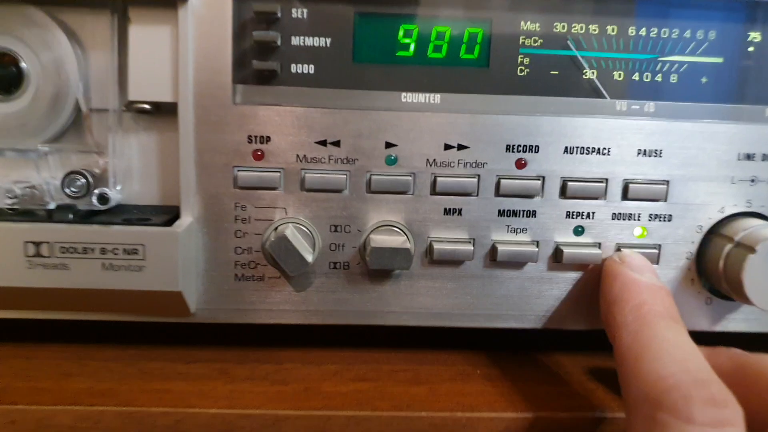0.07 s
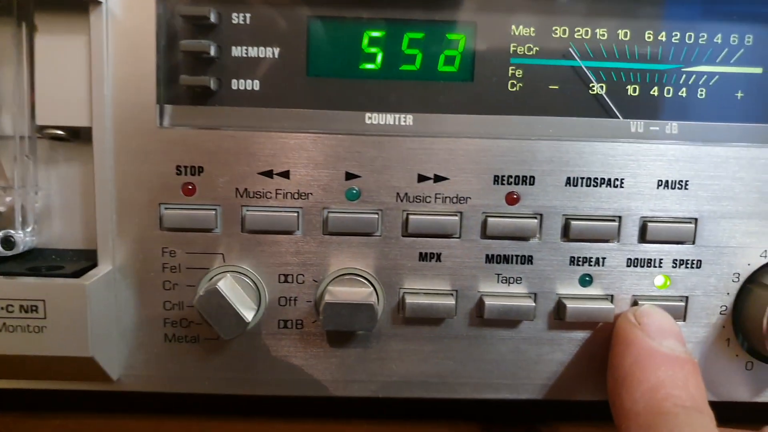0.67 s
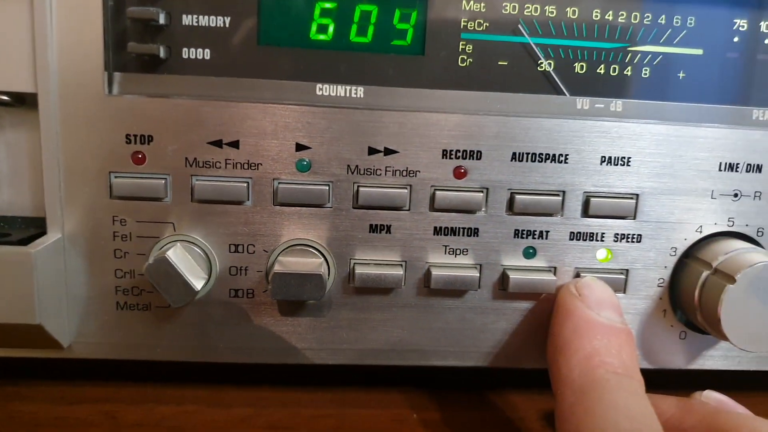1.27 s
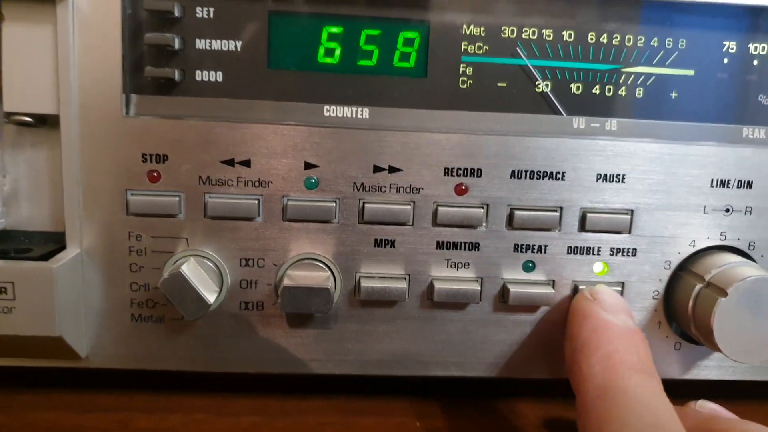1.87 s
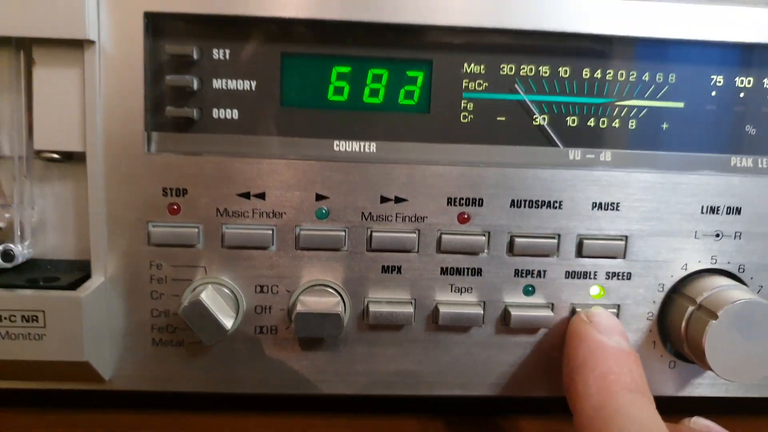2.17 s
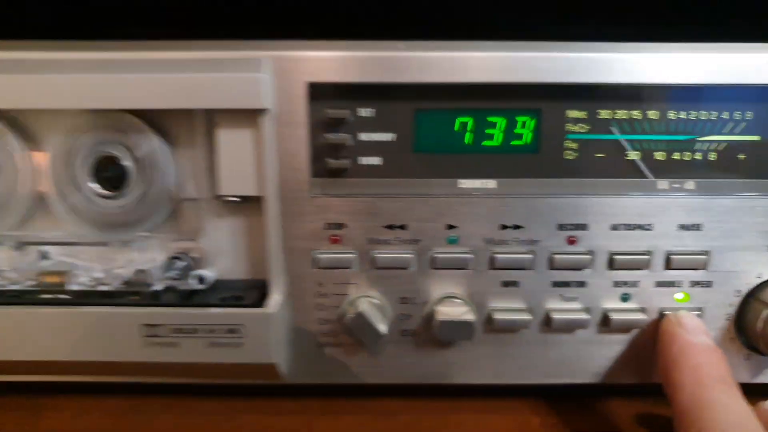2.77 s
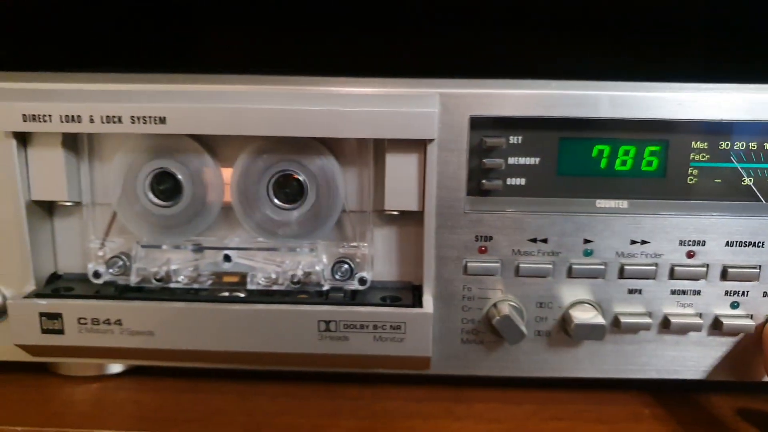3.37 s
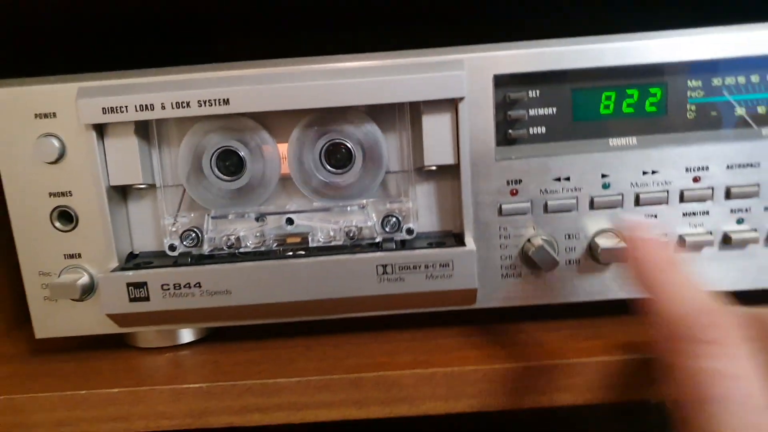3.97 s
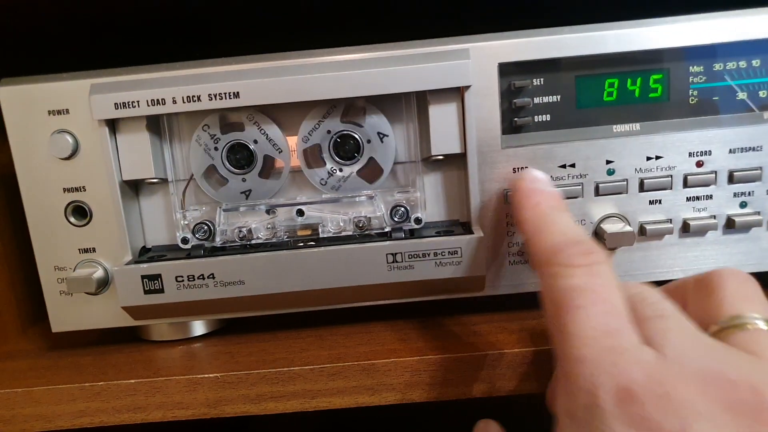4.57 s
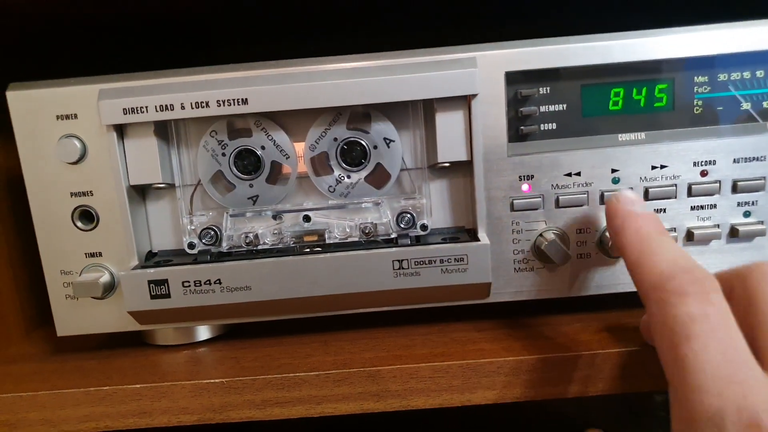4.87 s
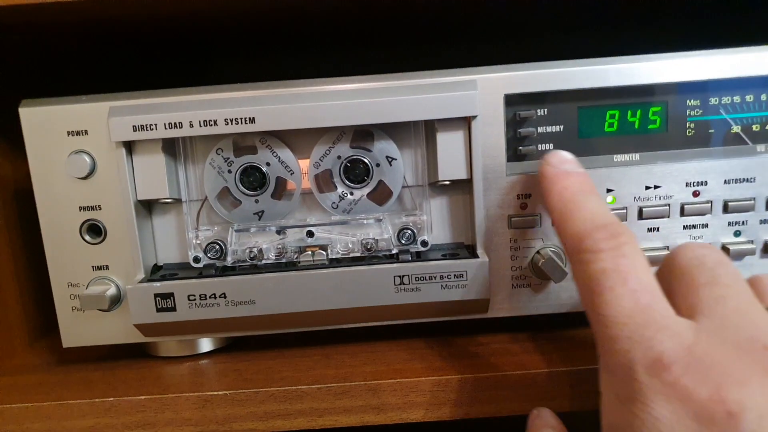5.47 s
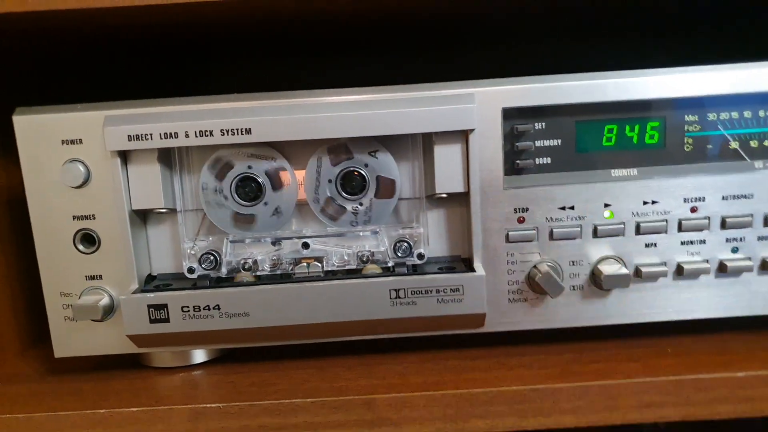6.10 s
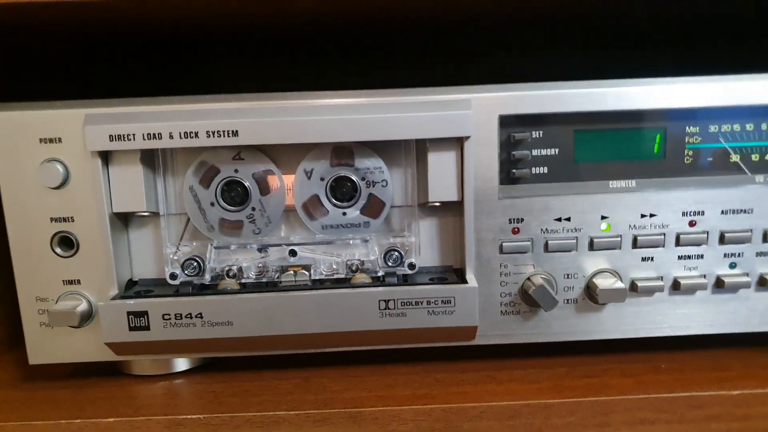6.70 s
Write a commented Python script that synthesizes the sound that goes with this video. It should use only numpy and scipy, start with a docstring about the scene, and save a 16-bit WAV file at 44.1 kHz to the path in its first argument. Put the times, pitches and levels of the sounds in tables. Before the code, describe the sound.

Close up in a small room, tape reels spin fast in a cassette deck, whirring and rasping over a motor hum, ticking now and then as the tape snags. Past halfway the whirr slows and softens, then ends in a clunk. Light button clicks alternate with three heavier clacks of the mechanism, leaving only a faint whisper of moving tape.

```python
"""Cassette deck winding, then playing

Close up, a deck fast-winds: the motor hums, the reel hubs rasp and rattle once a turn, the tape snags.
The winding drops to about half speed and stops with a clunk. Keys click, the mechanism slams into the
chassis three more times, and the tape runs on quietly at playing speed in a small room.
The listening point swings from beside the keys to the front of the cassette."""
import sys
import numpy as np
from scipy import signal
from scipy.fft import rfft, irfft, next_fast_len
from scipy.io import wavfile
from scipy.ndimage import map_coordinates

SR = 44100
rng = np.random.default_rng(int(sys.argv[2]) if len(sys.argv) > 2 else 0)


def file_out(sig):
    """Save sig as 16-bit WAV at sys.argv[1]."""
    # one column per channel
    cols = np.atleast_2d(sig).T
    # limit, then scale
    lim = np.clip(cols, -1, 1)
    pcm = np.round(lim * 32767).astype(np.int16)
    wavfile.write(sys.argv[1], SR, pcm)


N = 297234
TIME = np.arange(N) / SR
STOP_S = 4.52  # the brakes bite

# How hard the tape drags on hubs and guides: time_s, level_db
TAPE_DRAG = [(0, -0.8), (0.5, 0.5), (0.85, -1.5), (1.55, -0.8), (2.4, 0.5), (2.7, -0.4), (3.25, 0.5),
             (3.58, 0), (3.8, 1.5), (4.45, -3)]
# Hollow ring of the cassette shell: pitch_hz, width_hz, side_db, front_db
SHELL_MODES = [(1494, 260, -4, 2.5), (1677, 80, 2, -22), (1799, 40, 4, 9.5), (2250, 120, -5.5, -32)]
# Brighter ring of the hubs: pitch_hz, width_hz, side_db, front_db
HUB_MODES = [(2627, 55, 2, -5), (2853, 63, -10, 7), (3493, 64, -1.5, -3), (3830, 114, -2.5, -9),
             (4150, 200, -14.5, 3.5), (4256, 78, -1.5, -22.5), (4620, 245, -3.5, -1),
             (5460, 170, -11.5, -17.5)]
# Coarse body of the friction: freq_hz, level_db
RASP_SPECTRUM = [(1120, -18.5), (1900, -5), (1990, -11), (2190, -2), (2400, -5.5), (2550, -3), (2700, 0.5),
                 (3200, -7.5), (3560, -0.5), (4130, -5), (4700, -5), (5160, -24), (6500, -21.5),
                 (8450, -56.5), (14300, -120)]
# Its bright hiss: freq_hz, level_db
HISS_SPECTRUM = [(3240, -26.5), (5500, -1.5), (5920, -3.5), (6830, -7.5), (7390, -9.5), (9300, -3.5),
                 (10500, -17), (13600, -35), (22000, -120)]
# Its fizzy top: freq_hz, level_db
SIZZLE_SPECTRUM = [(6180, -36), (10500, -4.5), (11100, -1.5), (12100, 2), (15100, -10), (15800, -6.5)]
REEL_TURNS_PER_S = 66.5  # the emptying reel at double speed


def reels():
    """Gritty friction rings the hubs and the shell; slow reels chatter in separate beats."""
    turns = np.cumsum(REEL_TURNS_PER_S * drive() * (1 + 0.008 * wobble(8))) / SR
    slow = 1 - drive()
    grit = unit(amp(2 * wobble(900) + 0.47 * wobble(60)))
    friction = grit * rub(turns, sharp=0.28 + 0.08 * slow, scatter_db=1.56)
    beats = rub(turns, sharp=0.15 + 1.9 * slow + 0.6 * shudder(), scatter_db=1)
    shell = rattling(noise(apart=0.99) * beats, SHELL_MODES)
    chatter = coloured(shell, [(900, -19), (1300, -12.5), (1450, 4), (2300, -2.5), (3200, -8.5)])
    hubs = rattling(noise(apart=1) * friction, HUB_MODES)
    rasp = amp(-5.5) * coloured(noise(apart=0.99) * friction, RASP_SPECTRUM) + amp(-3) * hubs
    hiss = coloured(noise(apart=1) * friction * amp(2.1 * wobble(120)), HISS_SPECTRUM)
    sizzle = coloured(noise(apart=0.86) * friction * amp(2.9 * wobble(120)), SIZZLE_SPECTRUM)
    chatter *= winding_gain(-47.5, doubling_db=4, front_db=0, shudder_db=3.5)
    rasp *= winding_gain(-40, doubling_db=9.5, front_db=-0.5, shudder_db=4)
    hiss *= winding_gain(-56.5, doubling_db=12.5, front_db=4, shudder_db=1.5)
    sizzle *= winding_gain(-52, doubling_db=7.5, front_db=-2, shudder_db=1.2)
    return amp(curves(TAPE_DRAG)[0]) * (chatter + rasp + hiss + sizzle)


def rub(turns, sharp, scatter_db):
    """A hub catches once a turn, each time with a new strength."""
    strength = amp(scatter_db * rng.standard_normal(int(turns[-1]) + 2))
    return unit(np.exp(-sharp * np.cos(2 * np.pi * turns)) * strength[turns.astype(int)])


def rattling(x, modes):
    """A part's resonances, whose strengths depend on where the listener is."""
    facing = curves(LISTENER_PATH)[0]
    side = resonate(x, [(hz, width, db) for hz, width, db, _ in modes])
    front = resonate(x, [(hz, width, db) for hz, width, _, db in modes])
    return (1 - facing) * side + facing * front


def drive():
    """Share of double speed: it drops when the double-speed key is let go, then creeps up."""
    release_s, slowed_s = 3.46, 3.72
    return np.interp(TIME, [release_s, slowed_s], [1, 0.56]) + 0.06 * since(slowed_s)


def running():
    """1 while the deck winds, falling fast when the brakes bite."""
    return amp(-400 * since(STOP_S))


def shudder():
    """0-1: a snag leaves the reel shaking loosely on its hub."""
    return held(0.864, attack=0.031, hold=0.18, release=0.38)


def winding_gain(db, doubling_db, front_db, shudder_db):
    """db at double speed, shifted per doubling of speed, in front of the cassette and in the shudder."""
    facing = curves(LISTENER_PATH)[0]
    return amp(db + doubling_db * np.log2(drive()) + front_db * facing + shudder_db * shudder())


# The motor's pace at double speed: time_s, turns_per_s
MOTOR_SPEED = [(0, 24.5), (0.9, 24.5), (1.7, 24.7), (2.3, 24.68), (3.4, 25.1)]
# Tones of the turning shaft: harmonic_number, level_db
SHAFT_HARMONICS = [(4, -8.5), (5, -10.5), (6, -9), (7, 1.5), (8, -6), (9, -10), (10, -8.5), (11, -3.5),
                   (14, -10), (16, -13), (17, -11), (18, -8.5), (20, -12), (21, -11.5), (22, -2),
                   (23, -7.5), (24, -8.5), (25, -14), (29, -9.5), (32, -8), (33, -17.5), (35, -16),
                   (36, -40.5), (37, -24), (38, -7.5), (39, -1), (41, -8), (43, -23.5), (45, -6.5),
                   (48, -29)]
# Motor rumble in the frame: freq_hz, level_db
FRAME_SPECTRUM = [(40, -27.5), (70, -1), (110, -2.5), (260, 1.5), (320, -13.5), (400, -4.5), (600, 2.5),
                  (680, -2.5), (790, -0.5), (1000, 0), (1200, -3), (1500, -2.5), (2200, -42)]


def motor():
    """The shaft hums and the frame rumbles; the hum sinks into the rumble as the speed drops."""
    speed = curves(MOTOR_SPEED)[0] * drive()
    turns = np.cumsum(speed * (1 + 0.001 * wobble(5.66))) / SR
    hum = sum(amp(db + 0.2 * wobble(5.1)) * np.sin(2 * np.pi * (harmonic * turns + rng.random()))
              for harmonic, db in SHAFT_HARMONICS)
    rumble = coloured(noise(apart=0.6), FRAME_SPECTRUM)
    return (unit(hum) * winding_gain(-50, doubling_db=22.5, front_db=-5.5, shudder_db=1)
            + rumble * winding_gain(-54.5, doubling_db=0.5, front_db=-2.5, shudder_db=1.5))


def hub_whine():
    """A thin, unsteady tone whines from a hub."""
    tone = noise_band(pitch_hz=3500, width_hz=22, apart=0.5)
    return tone * winding_gain(-56.5, doubling_db=13.5, front_db=1.5, shudder_db=2.5)


# Sharp ticks as the tape snags: start_s, level_db
SNAGS = [(0.3215, -24.5), (0.5107, -24.5), (0.604, -23), (0.7557, -21), (0.8785, -17.5), (2.4453, -25),
         (3.1637, -23), (3.1948, -20.5), (3.2794, -17.5), (3.4693, -22.5), (3.5425, -23)]
# The ping of a knocked hub: pitch_hz, width_hz, level_db
HUB_PING = [(2864, 70, 0), (3505, 32, 2), (4670, 140, -3)]


def snags():
    """Short scrapes of a hub against its shell, each leaving the hub ringing."""
    out, t = np.zeros((2, N)), np.arange(SR // 20) / SR
    scrape = burst(t, rise_s=0.0016, t60_s=0.03)
    for start_s, db in SNAGS:
        rasp, hiss, sizzle = (coloured(noise(apart=0.99, size=len(t)), band)
                              for band in (RASP_SPECTRUM, HISS_SPECTRUM, SIZZLE_SPECTRUM))
        tick = scrape * (amp(-7) * rasp + amp(-13.5) * (hiss + sizzle))
        ping = resonate(scrape * noise(apart=0.7, size=len(t)), HUB_PING)
        add(out, start_s, amp(db) * (tick + amp(-23.5) * ping))
    return out


# A pawl slips just ahead of a slam: start_s, level_db
PAWL_SLIPS = [(5.309, -47.5), (5.933, -35.5)]
# Scrape of the sliding arm: freq_hz, level_db
ARM_SPECTRUM = [(300, -3), (900, 10), (2300, 1.5), (4000, -5), (7000, -21), (15000, -27)]
# The mechanism slams home, its six bands relative to the level:
# start_s, level_db, boom_db, thump_db, knock_db, clank_db, crack_db, sheen_db, run_up_s
SLAMS = [(4.51, -16, -19, -17, -21, -21.5, -16, -16.5, 0.002),
         (5.336, -9, -19, -17, -23, -20.5, -16, -19.5, 0.0086),
         (5.959, -8, -23, -20, -18.5, -17.5, -15, -14, 0.0087),
         (6.166, -6.5, -21, -13.5, -19.5, -24, -15.5, -14.5, 0.013)]


def clunks():
    """Pawls slip; the head carriage scrapes up, slams into the chassis, and the heavy parts rock back."""
    out, t = np.zeros((2, N)), np.arange(SR // 20) / SR
    for start_s, db in PAWL_SLIPS:
        slip = coloured(noise(apart=0.36, size=len(t)), ARM_SPECTRUM)
        add(out, start_s, amp(db) * burst(t, rise_s=0.0023, t60_s=0.13) * slip)
    for start_s, db, *colour, run_up_s in SLAMS:
        bands_db = db + np.array(colour)
        slide = coloured(noise(apart=0.93, size=len(t)),
                         [(300, -8.5), (2000, 8), (6000, 1), (15000, -12.5)])
        add(out, start_s - run_up_s, amp(db - 12) * burst(t, rise_s=0.0039, t60_s=0.047) * slide)
        add(out, start_s, blow(bands_db, rise_s=0.0025, ring_db=4, clatter_db=5.5))
        rock_back_db = bands_db + [-10, -5.5, -6, -23.5, -35, -35]
        add(out, start_s + 0.047, blow(rock_back_db, rise_s=0.0064, ring_db=-0.5, clatter_db=2))
    return out


# Borders of boom, thump, knock, clank, crack and sheen: edge_hz
BAND_EDGES = np.array([80, 160, 300, 800, 2000, 6000, 15500])
# Ring of the struck chassis: pitch_hz, level_db, t60_s
CHASSIS_MODES = [(96, -10.5, 0.41), (130.2, 2, 0.21), (175, -5.5, 0.28), (209.3, 2, 0.17), (350, -16, 0.15),
                 (384.6, -11, .23), (407, -11, 0.18), (428, -2, 0.21), (538, -1.5, .16),
                 (553.7, -12.5, 0.24), (620, -11.5, 0.2), (693, -11.5, 0.14), (812, -11.5, 0.23),
                 (955, -10.5, 0.18), (1042, -7, 0.22), (1087, -12, 0.18), (1190, -22, .15),
                 (1480, -5, 0.089), (1530, 2, 0.088), (1700, -8.5, 0.094), (1857, -5.5, 0.078),
                 (2210, -6, 0.052), (2447, -10, 0.11), (3050, -19, 0.073), (8400, -15.5, 0.062)]
# How long the clatter hangs on: freq_hz, t60_s
CLATTER_DECAY = [(100, 0.21), (400, 0.19), (1000, 0.14), (2500, 0.062), (6000, 0.039), (15000, 0.043)]


def blow(bands_db, rise_s, ring_db, clatter_db):
    """One contact: dense clatter and the chassis modes, coloured by where and how hard it lands."""
    t = np.arange(SR // 2) / SR
    centres_hz = np.sqrt(BAND_EDGES[1:] * BAND_EDGES[:-1])
    colour = list(zip(centres_hz, bands_db))
    density_db = bands_db - 10 * np.log10(np.diff(BAND_EDGES) / (SR / 2))
    density = [(30, -59.5), *zip(centres_hz, density_db)]
    presence = [(200, -10), (1000, -1), (4000, 5.5), (7000, 0.5), (12000, 1)]
    clatter = filtered(noise(apart=1, size=len(t)),
                       lambda hz: amp(along(density, hz) + along(presence, hz)))
    clatter = fading(clatter, CLATTER_DECAY) * (1 - np.exp(-t / rise_s))
    ring = np.zeros(len(t))
    for k, (hz, db, t60_s) in enumerate(CHASSIS_MODES):
        strength = (-1) ** k * amp(db + along(colour, hz) + rng.normal(0, 1))
        swing = burst(t, rise_s=2.8 / hz, t60_s=t60_s)  # heavy low modes swing up slowly
        ring += strength * swing * np.sin(2 * np.pi * hz * t)
    return amp(clatter_db) * clatter + amp(ring_db) * ring


# Clicks of keys and catches, and at 4.559 s the first slam's heavy parts rocking back; their six bands relative
# to the level: # start_s, level_db, boom_db, thump_db, knock_db, clank_db, crack_db, sheen_db
KEY_CLICKS = [(4.46, -27.5, -31, -30, -32.5, -22, -8, -21), (4.559, -30, -10, -0.5, -10, -20.5, -10, -17),
              (5.103, -33.5, -32, -30, -30, -24, -3, -14),
              (5.255, -49.5, -15.5, -18.5, -5.5, -9, -23.5, -32.5),
              (5.776, -34, -25.5, -26, -13, -8.5, -17, -33)]
# A finger pushes a key in or lets it go: start_s, level_db
KEY_PRESSES = [(5.064, -61), (5.103, -47.5), (5.253, -55.5), (5.775, -41.5)]
# Ring of a plastic key on its stem: pitch_hz, width_hz, level_db
KEY_MODES = [(584, 57, -3.5), (1030, 150, 3), (2170, 160, -3), (3600, 320, -17.5)]


def keys():
    """Light contacts of keys and catches, and the low rock-back after the first slam; a pushed key also rings
    briefly itself."""
    out, t = np.zeros((2, N)), np.arange(SR // 5) / SR
    for start_s, db, *colour in KEY_CLICKS:
        add(out, start_s, blow(db + np.array(colour), rise_s=0.0038, ring_db=-1.5, clatter_db=3))
    for start_s, db in KEY_PRESSES:
        ring = resonate(noise(apart=0.58, size=len(t)), KEY_MODES)
        add(out, start_s, amp(db) * burst(t, rise_s=0.003, t60_s=0.17) * ring)
    return out


# Soft knocks on the case: start_s, level_db
CASE_BUMPS = [(3.488, -50), (3.738, -50.5), (4.063, -51.5), (4.114, -38), (4.157, -50.5), (4.201, -48.5),
              (4.645, -50.5), (4.688, -62), (4.859, -58)]
# Boxy tone of the case: pitch_hz, width_hz, level_db
CASE_MODES = [(106, 57, -4.5), (227.4, 32, 4.5), (398, 27, -7), (842, 75, -7)]


def bumps():
    """Soft, dull thuds swell in the case's low resonances."""
    out, t = np.zeros((2, N)), np.arange(SR // 6) / SR
    rise = t / 0.016
    swell = (rise * np.exp(1 - rise)) ** 2
    for start_s, db in CASE_BUMPS:
        body = resonate(noise(apart=0.51, size=len(t)), CASE_MODES)
        thud = coloured(body, [(900, -9.5), (2500, 7), (6000, -28)])
        add(out, start_s, amp(db) * swell * thud)
    return out


# A low pop with a crisp edge: freq_hz, level_db
SNAP_SPECTRUM = [(150, 14), (400, 1), (1200, -36), (3200, 0), (5500, -29), (8000, -48)]


def snap():
    """One tiny dry click after the reels have stopped."""
    out, t = np.zeros((2, N)), np.arange(SR // 50) / SR
    click = amp(-60 * t / 0.02) * noise(apart=1, size=len(t))
    add(out, 4.9, amp(-53.5) * coloured(click, SNAP_SPECTRUM))
    return out


# Whisper of tape at playing speed: freq_hz, level_db
TAPE_SPECTRUM = [(300, -22.5), (480, -26), (570, 11), (700, -16.5), (1400, -18), (1800, -1), (2100, -8),
                 (2700, -4), (3800, -16), (6100, -5.5), (7300, -21.5), (8200, -5.5), (11500, -14),
                 (15500, -26.5)]


def playing():
    """The drive whirs, the tape whispers past the head as it tightens, and the take-up reel rubs."""
    play_s = 5.98
    tension = ramp(play_s, rise_s=0.1) * amp(-74 + 7 * since(play_s))
    tape = tension * coloured(noise(apart=1), TAPE_SPECTRUM)
    whir = ramp(5.2, rise_s=0.06) * noise_band(pitch_hz=2380, width_hz=160, apart=0.8)
    take_up = ramp(6.52, rise_s=0.22) * noise_band(pitch_hz=1830, width_hz=120, apart=1)
    return tape + amp(-79) * whir + amp(-67) * take_up


# The cam moves the head carriage: start_s, end_s
CAM_TURNS = [(5.3, 5.52), (5.96, 6.3)]
# Low murmur of the idling deck: freq_hz, level_db
MURMUR_SPECTRUM = [(59, -52), (100, -14), (134, -16.5), (233, -7), (270, -34), (629, -33), (900, -48),
                   (1170, -72), (1980, -120)]
# Soft bed of hiss: freq_hz, level_db
AIR_SPECTRUM = [(180, -38.5), (300, -3.5), (744, -3), (1000, -8.5), (1220, -8.5), (2140, -12), (2320, -8),
                (7140, -26.5), (15500, -23.5)]


def idle():
    """Deck murmur and room hiss; both lift as the winding motor runs out and as the cam whirs."""
    bed, ramp_s = amp(-80), 0.06
    coast = (1 - running()) * amp(-56 - 59 * since(STOP_S + 0.18))
    cam = amp(-71) * sum(held(start - ramp_s, ramp_s, end - start, ramp_s) for start, end in CAM_TURNS)
    murmur = (bed + coast + cam) * coloured(noise(apart=0.6), MURMUR_SPECTRUM)
    hiss = (bed + amp(-18.5) * coast + cam) * coloured(noise(apart=1), AIR_SPECTRUM)
    return murmur + hiss


def capstan_hum():
    """The capstan motor turns just below the mains frequency, so the two hums beat slowly."""
    capstan_hz, mains_hz, null_s = 49.22, 50, 0.6
    phase = 2 * np.pi * (TIME - null_s)
    beating = amp(-67) * np.sin(capstan_hz * phase) - amp(-66.5) * np.sin(mains_hz * phase)
    octave = amp(-75.5 + 2.5 * wobble(4.4)) * np.sin(2 * capstan_hz * phase)
    bearing = coloured(noise(apart=0.4), [(28, -20.5), (52, -0.5), (85, 0), (200, -41)])
    return beating + octave + amp(-76.5) * bearing


# The swing from beside the keys (facing 0) to the cassette's front (1): time_s, facing, left_lead_ms
LISTENER_PATH = [(0, 0.29, 0.28), (2.3, 0.07, 0.31), (2.9, 0.75, 0.26), (3.3, 0.93, 0.19), (4.2, 1, .09),
                 (6.7, 0.75, 0.082)]
# Pan of the winding from beside the keys: freq_hz, left_minus_right_db
SIDE_PAN = [(60, 10), (110, 2), (200, 1), (380, -6.5), (700, -2), (1290, 5), (2380, 14), (4400, 4.5),
            (8120, 8.5), (15000, 24)]
# Pan of the winding from the front: freq_hz, left_minus_right_db
FRONT_PAN = [(60, 10), (110, 1), (200, -2), (380, -3.5), (700, -1), (1290, 6), (2380, 12.5), (4400, -1.5),
             (8120, 13), (15000, 7.5)]
# Pan of the mechanism deep in the case: freq_hz, left_minus_right_db
INSIDE_PAN = [(60, -3), (110, 2.5), (200, -1), (380, 0.5), (700, -2), (1290, 3.5), (2380, 11), (4400, 4),
              (8120, 14.5), (15000, 9)]


def stereo_image(winding, blows):
    """The transport lies to the left: that side hears it first and brighter."""
    facing, lead_ms = curves(LISTENER_PATH)
    panned = (1 - facing) * shaded(winding, SIDE_PAN) + facing * shaded(winding, FRONT_PAN)
    left, right = panned + shaded(blows, INSIDE_PAN)
    return np.array([left, map_coordinates(right, [np.arange(N) - lead_ms * SR / 1000], order=3)])


# The small room's tail: freq_hz, t60_s
ROOM_DECAY = [(100, 0.44), (500, 0.28), (2000, 0.25), (6000, 0.23), (15000, 0.21)]


def room(x):
    """The shelf and the walls answer with a short diffuse tail."""
    tail = joined(fading(rng.standard_normal((2, SR // 2)), ROOM_DECAY), edge_hz=600)
    tail *= 1 - np.exp(-np.arange(SR // 2) / SR / 0.0017)
    return signal.fftconvolve(x, tail / np.linalg.norm(tail[0]), axes=1)[:, :N]


def shaded(x, pan):
    """The microphone's housing shades one side more than the other, band by band."""
    return filtered(x, lambda hz: amp(np.outer([1, -1], along(pan, hz)) / 2))


def joined(x, edge_hz):
    """Long waves reach both sides alike."""
    return x + filtered(x[::-1] - x, lambda hz: 0.5 / (1 + (hz / edge_hz) ** 4))


def amp(db):
    """Decibels to gain."""
    return 10 ** (np.asarray(db) / 20)


def unit(x):
    """Scaled to rms 1."""
    return x / np.sqrt(np.mean(x ** 2) + 1e-20)


def along(points, hz):
    """Read (freq_hz, value) points on a log axis."""
    freqs, values = np.transpose(points)
    return np.interp(np.log(hz + 1), np.log(freqs + 1), values)


def curves(rows):
    """One value per sample for each column after the time."""
    times, *columns = np.transpose(rows)
    return [np.interp(TIME, times, column) for column in columns]


def since(start_s):
    """Seconds since start_s, 0 before it."""
    return np.maximum(TIME - start_s, 0)


def ramp(start_s, rise_s):
    """A straight fade from 0 to 1."""
    return np.minimum(since(start_s) / rise_s, 1)


def held(start, attack, hold, release):
    """An envelope from 0 to 1 and back, timed in seconds."""
    return np.interp(TIME, start + np.cumsum([0, attack, hold, release]), [0, 1, 1, 0])


def burst(t, rise_s, t60_s):
    """A rounded attack and an exponential decay."""
    return (1 - np.exp(-t / rise_s)) * amp(-60 * t / t60_s)


def wobble(rate):
    """A smooth random curve, rate knots a second."""
    return map_coordinates(rng.standard_normal(int(N * rate / SR) + 4), [TIME * rate])


def noise(apart, size=N):
    """Stereo white noise: a common part, plus each side's own part weighted by apart."""
    return unit(rng.standard_normal(size) + apart * rng.standard_normal((2, size)))


def noise_band(pitch_hz, width_hz, apart):
    """Stereo noise through one resonance, at rms 1."""
    return resonate(noise(apart), [(pitch_hz, width_hz, 0)])


def filtered(x, response):
    """x times a response of frequency."""
    size = x.shape[-1]
    padded = next_fast_len(size + 8192)
    return irfft(rfft(x, padded) * response(np.fft.rfftfreq(padded, 1 / SR)), padded)[..., :size]


def coloured(x, spectrum):
    """x shaped by (freq_hz, level_db) points, at rms 1."""
    return unit(filtered(x, lambda hz: amp(along(spectrum, hz))))


def resonate(x, modes):
    """x through (pitch_hz, width_hz, level_db) resonances of alternating sign, at rms 1."""
    def response(hz):
        return sum((-1) ** k * amp(db) * 1j * hz * width / (pitch ** 2 - hz ** 2 + 1j * hz * width)
                   for k, (pitch, width, db) in enumerate(modes))
    return unit(filtered(x, response))


def fading(x, t60s):
    """Each frequency of x dies at its own speed."""
    hz, t, frames = signal.stft(x, SR, nperseg=128)
    decay = amp(-60 * t / along(t60s, hz)[:, None])
    return signal.istft(frames * decay, SR, nperseg=128)[1][:, :x.shape[-1]]


def add(track, start_s, sound):
    """Mix a sound in at start_s."""
    part = track[:, round(start_s * SR):][:, :sound.shape[-1]]
    part += sound[..., :part.shape[-1]]


def scene():
    """Rattle and blows ring in the room; the motor is heard straight from the frame."""
    blows = joined(clunks() + keys() + bumps(), edge_hz=260)
    drone = running() * motor()
    background = snap() + capstan_hum() + idle() + playing()
    rattle = running() * (reels() + hub_whine()) + snags()
    return stereo_image(rattle + drone, blows) + amp(-11.5) * room(rattle + blows) + background


def record(dry):
    """A steep low-pass takes off the very top."""
    cutoff_hz = 15750
    return filtered(dry, lambda hz: 1 / np.sqrt(1 + (hz / cutoff_hz) ** 180))


dry = scene()
out = record(dry)
file_out(out)
```